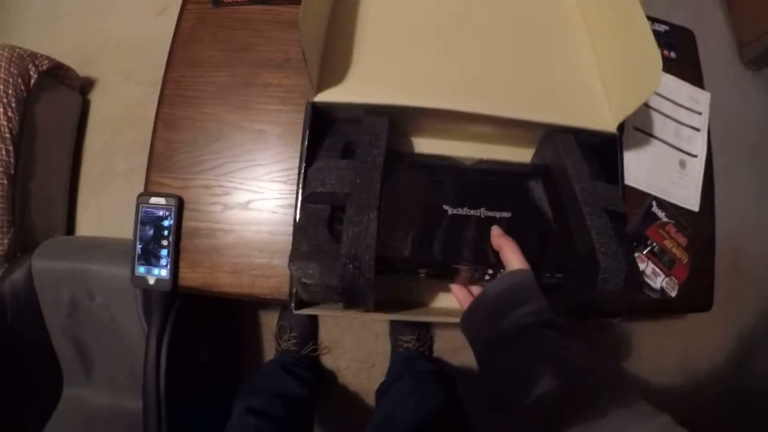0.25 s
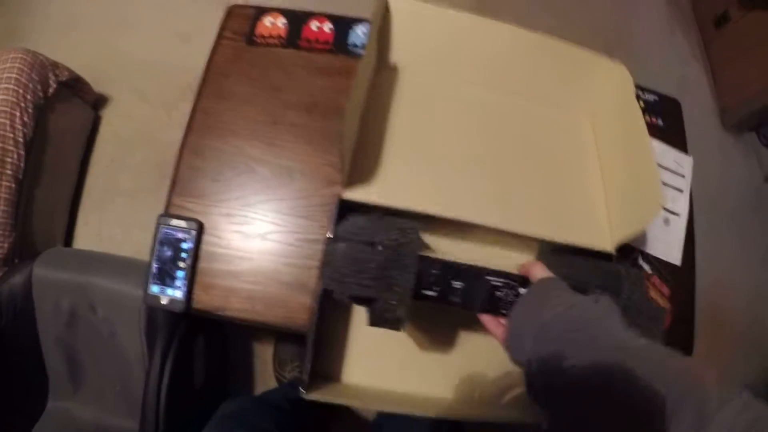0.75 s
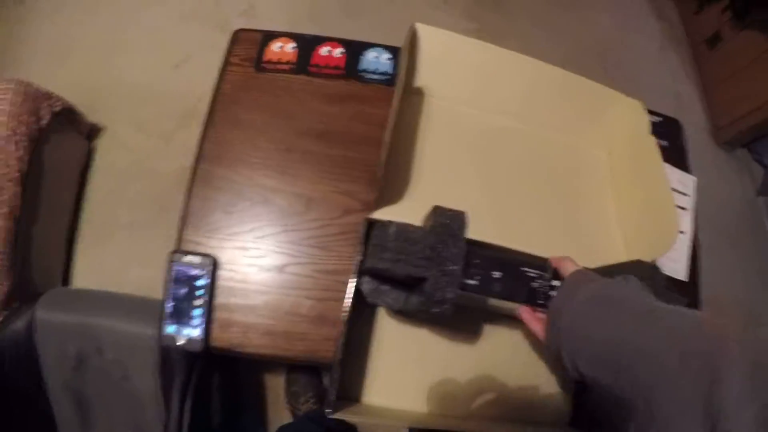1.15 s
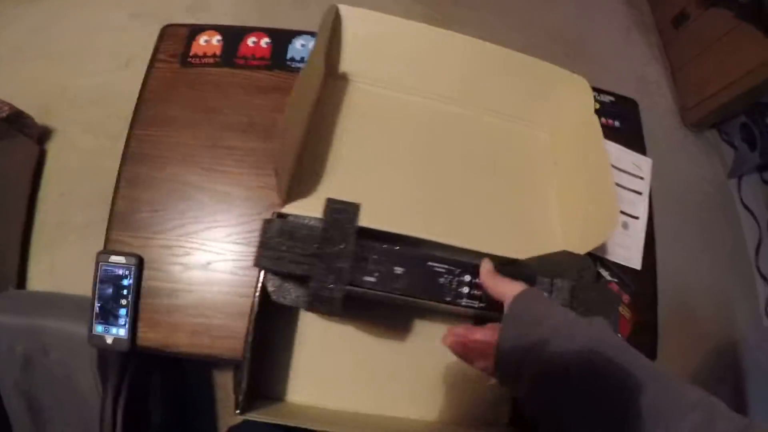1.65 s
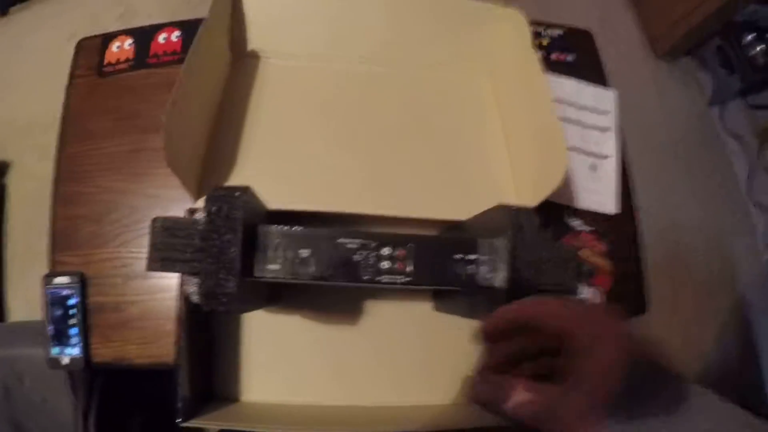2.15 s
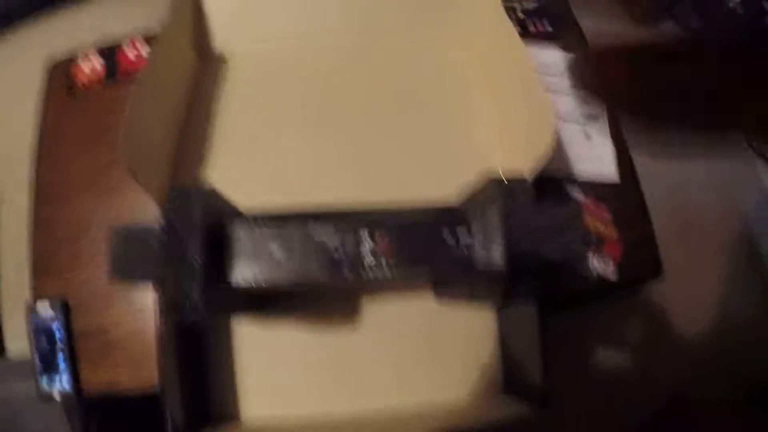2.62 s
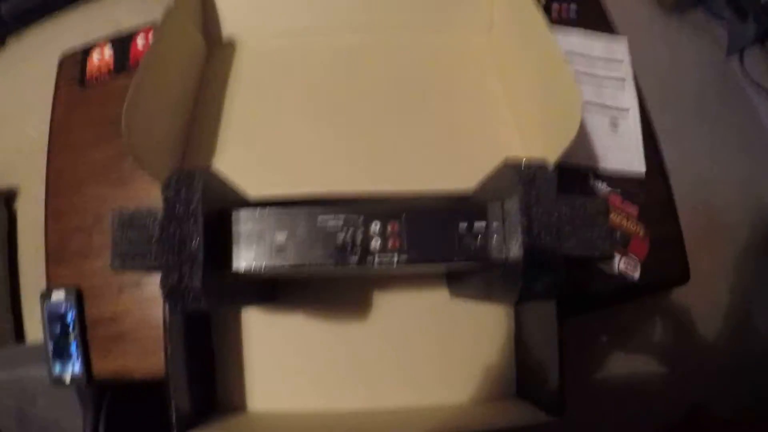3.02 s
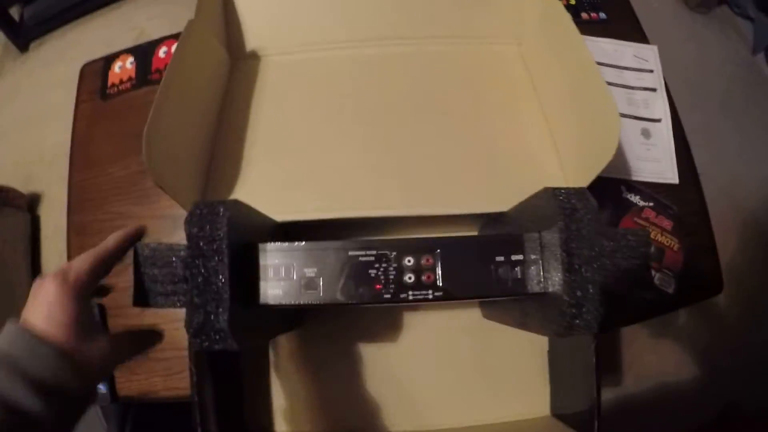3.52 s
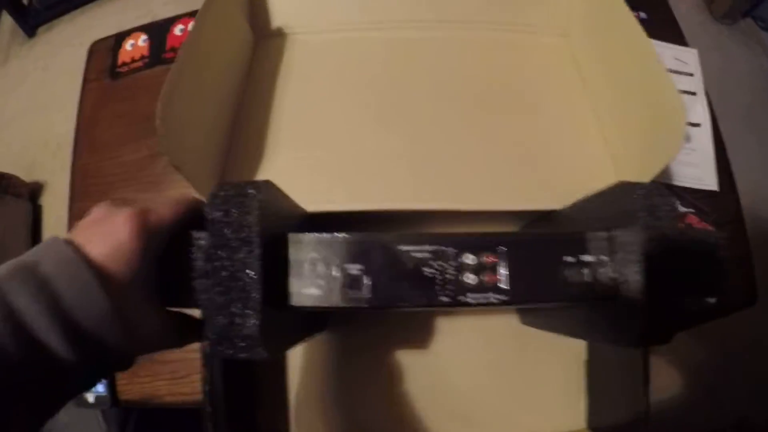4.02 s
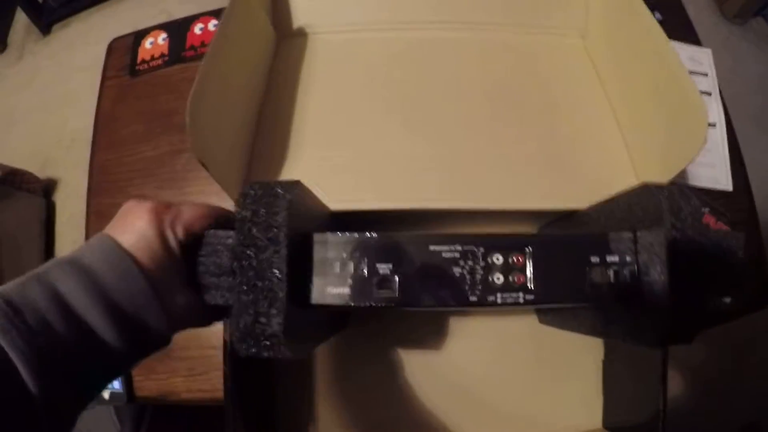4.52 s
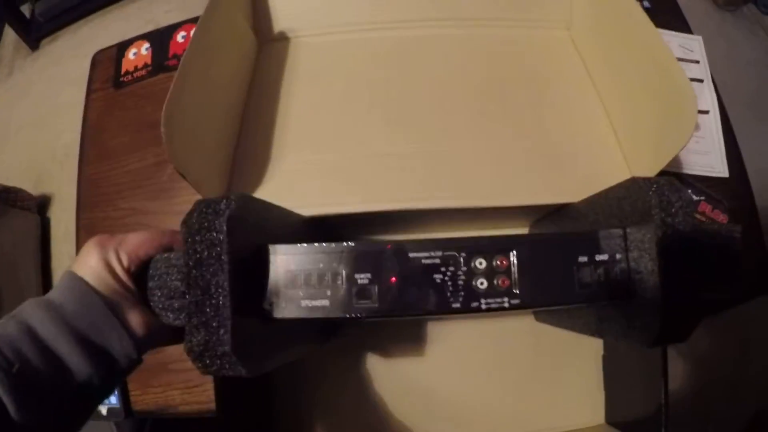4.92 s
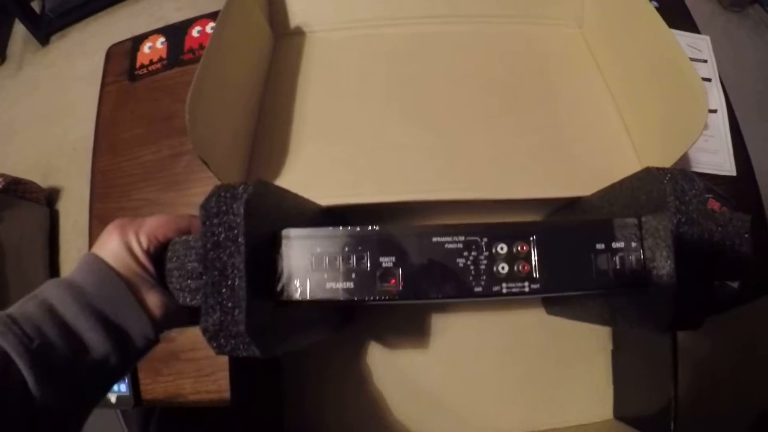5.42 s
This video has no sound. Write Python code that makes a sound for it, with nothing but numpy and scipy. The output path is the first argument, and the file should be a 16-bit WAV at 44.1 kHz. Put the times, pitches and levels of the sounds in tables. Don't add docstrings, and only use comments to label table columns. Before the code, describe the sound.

Foam scrapes and squeaks grainily against cardboard, a thud lands, then loud muffled bumps hit the microphone and foam creaks and crackles.

```python
import sys
import numpy as np
from scipy import signal
from scipy.io import wavfile
from scipy.ndimage import uniform_filter1d

SR = 44100
rng = np.random.default_rng(int(sys.argv[2]) if len(sys.argv) > 2 else 0)


def gain_from_db(level_db):
    decades = np.asarray(level_db, float) / 20
    return 10 ** decades


def unload_audio(sound):
    columns = np.transpose(np.atleast_2d(sound))
    steps = np.round(np.clip(columns, -1, 1) * 32767)
    wavfile.write(sys.argv[1], SR, steps.astype(np.int16))


N = 249768


def evened(x):
    return x / np.sqrt(np.mean(x ** 2) + 1e-20)


def colour(x, points):
    f_hz, db = np.transpose(points)
    bins_hz = np.fft.rfftfreq(8192, 1 / SR)
    log_gain = np.log(gain_from_db(np.interp(np.log(bins_hz + 1), np.log(f_hz), db, -100, -100)))
    circle = np.r_[log_gain, log_gain[-2:0:-1]]
    phase = signal.hilbert(circle).imag
    taps = np.fft.ifft(np.exp(circle - 1j * phase)).real[:6000]
    return signal.oaconvolve(x, taps / np.linalg.norm(taps))[:len(x)]


def add(mix, s, sound):
    part = mix[round(s * SR):][:len(sound)]
    part += sound[:len(part)]


def room():
    # (frequency [Hz], level [dB per Hz])
    rumble_spectrum = [(12, -31), (20, 2.5), (43, -6.5), (65, -11.5), (160, -24), (221, -29), (294, -28),
                       (332, -30.5), (398, -31), (487, -38), (517, -36.5), (572, -39), (2500, -58.5),
                       (3250, -72.5), (5500, -120)]
    # (time [s], level re mean [dB])
    swell_points = [(0, 3), (.5, -3.5), (1, 1), (1.5, -1), (2, -1.5), (2.5, 0), (3, 4), (3.5, -5), (4, 1.5),
                    (4.5, -3.5), (5, -2), (5.66, -2)]
    # (frequency [Hz], level [dB per Hz])
    hiss_spectrum = [(1500, -31), (2500, -5), (3400, -12), (4260, -22), (5900, -16.5), (6500, -1),
                     (7900, -1.5), (10300, -6.5), (12000, -14), (13500, -21), (15200, -30)]
    rumble_db, hiss_db, crossover_hz = -34, -64.9, 140
    rumble = gain_from_db(rumble_db) * colour(rng.standard_normal(N), rumble_spectrum)
    low = signal.sosfiltfilt(signal.butter(2, crossover_hz, fs=SR, output="sos"), rumble)
    swell = gain_from_db(np.interp(np.arange(N) / SR, *np.transpose(swell_points)))
    hiss = gain_from_db(hiss_db) * colour(rng.standard_normal(N), hiss_spectrum)
    return rumble + low * (swell - 1) + hiss


def slips(per_s, spread_db, clump_db, clump_ms):
    clump = evened(uniform_filter1d(rng.standard_normal(N), int(clump_ms * SR / 1000)))
    size = gain_from_db(spread_db * np.minimum(rng.exponential(1, N), 4) + clump_db * clump)
    released = rng.random(N) < per_s / SR
    return evened(size * rng.standard_normal(N) * released)


def surges(rows, parts):
    t = np.arange(0, N + 16, 16) / SR
    start, peak, end, db, lean = np.transpose(rows)[:, :, None]
    rise = (t - start) / (peak - start)
    fall = (end - t) / (end - peak)
    ramp = np.clip(np.minimum(rise, fall), 0, 1)
    gains = []
    for re_db, db_per_lean, sharp in parts:
        each = gain_from_db(db + re_db + db_per_lean * lean) * ramp ** sharp
        gains.append(np.interp(np.arange(N) / SR, t, np.sqrt((each ** 2).sum(0))))
    return gains


def rub(gains, fizz, ring, drive):
    # (frequency [Hz], level [dB per Hz])
    wall = [(450, 0.5), (750, 3), (950, 2), (1280, 5), (1550, 1), (2000, -8), (3000, -21)]
    # (frequency [Hz], level [dB per Hz])
    air = [(70, -21), (130, -9), (220, 7), (300, -4), (380, 6), (520, -5), (900, -4)]
    # (frequency [Hz], level [dB per Hz])
    sheen_spectrum = [(5000, -34), (6800, 0), (8300, -2), (9900, -2.5), (11000, -12.5), (13000, -18),
                      (15200, -33)]
    body = sum((-1) ** k * colour(drive * gains[k], c) for k, c in enumerate((fizz, ring, wall, air)))
    sheen = gain_from_db(-47.0) * abs(gains[0] / gain_from_db(-35.5)) ** 1.19
    return body + colour(drive * rng.choice([-1, 1], N) * sheen, sheen_spectrum)


def narrow_ring(drive, rows, points, sharp):
    gain = surges(rows, [(0, 0, sharp)])[0]
    return colour(rng.choice([-1, 1], N) * drive * gain, points)


def sliding():
    # (start [s], peak [s], end [s], fizz [dB], darkness [dB])
    slide_surges = [
        (-.09, .12, 0.51, -39.5, -5),
        (.24, .458, 0.71, -38.5, -1.5),
        (.48, .622, 0.82, -40.5, -4.5),
        (.67, .725, .8, -43, -6.5),
        (.75, .83, 0.88, -46, -0.5),
        (.82, .905, .96, -48.5, 6.5),
        (.9, 1.018, 1.09, -52.5, 7),
        (1.03, 1.075, 1.32, -62.5, 10),
        (1.16, 1.22, 1.27, -63.5, 10.5),
        (1.27, 1.295, 1.3, -63, 13.5),
    ]
    # (level re fizz [dB], tilt [dB per dB of darkness], peak sharpness [1])
    slide_parts = [
        (0.5, 0, 1.64),
        (-0.5, -0.19, 1.31),
        (-2, 0.3, 0.63),
        (-0.5, 1.17, 0.6),
    ]
    # (frequency [Hz], level [dB per Hz])
    fizz_spectrum = [(2500, -101), (3900, -6), (4800, -1), (5600, -1.5), (6200, -7.5), (6800, -21),
                     (8000, -21), (11000, -42)]
    # (frequency [Hz], level [dB per Hz])
    ring_spectrum = [(1100, -67), (1600, -17), (2000, 7), (2400, 7), (2900, 8.5), (3400, 4), (3900, 6),
                     (5500, -86)]
    # (frequency [Hz], level [dB per Hz])
    panel = [(880, -35), (1020, -8), (1120, 0.5), (1290, 2.5), (1420, 0), (1600, -16), (2100, -40)]
    # (start [s], peak [s], end [s], level [dB], unused lean [dB])
    presses = [
        (.03, .14, 0.37, -47, 0),
        (.24, .47, 0.61, -40, 0),
        (.48, .68, 0.772, -45, 0),
        (1.003, 1.013, 1.034, -48, 0),
    ]
    # (frequency [Hz], level [dB per Hz])
    glint = [(9500, -30), (11000, -4), (12000, 0), (13000, -4), (14500, -14), (15200, -25)]
    # (start [s], peak [s], end [s], level [dB], unused lean [dB])
    rushes = [
        (.04, .13, .25, -78, 0),
        (.36, .45, 0.52, -69, 0),
        (.52, .62, .74, -73, 0),
    ]
    drive = slips(9000, 0.34, 0.32, 4.1)
    slide = rub(surges(slide_surges, slide_parts), fizz_spectrum, ring_spectrum, drive)
    return slide + narrow_ring(drive, presses, panel, .68) + narrow_ring(drive, rushes, glint, .8)


def bump(db, hz, t60, rise_ms, sag_ms):
    t = np.arange(SR // 4) / SR
    turns = hz * sag_ms / 1000 * np.log(1 + 1000 * t / sag_ms)
    shape = (1 - np.exp(-1000 * t / rise_ms)) * gain_from_db(-60 * (t / t60) ** 2)
    return gain_from_db(db) * shape / shape.max() * np.sin(2 * np.pi * turns)


def jolts():
    # (time [s], peak [dB], swing [Hz], t60 [s], rise [ms])
    pushes = [(0.142, -32, 151, 0.093, 9.1), (0.95, -15.5, 132, 0.045, .92), (.96, -22.5, 95, 0.21, 5.6),
              (0.9846, -9.5, 189, 0.011, 1.9), (1.004, -23.5, 147, 0.032, 1.1),
              (2.606, -3.5, 56, 0.113, 8.6), (2.696, -16, 48, 0.031, 3.1), (2.788, -17, 35, 0.028, 5.94),
              (2.813, -12, 102, 0.015, 0.82), (2.82, -9.5, 46, .053, 4.2),
              (2.8464, -3.5, 72.4, 0.015, 0.59), (3.022, -17.5, 96, 0.014, 1.2),
              (3.1343, -12, 117, 0.019, 2.3)]
    # (time [s], peak [dB], swing [Hz], t60 [s], rise [ms])
    slaps = [
        (3.0962, -6.5, 118, 0.064, 0.5),
        (3.1299, -7, 87.4, 0.062, 0.5),
    ]
    # (time [s], peak [dB], swing [Hz], t60 [s], rise [ms])
    pulls = [(0.9453, -21, 122, 0.0093, 2.2), (.985, -7, 159, 0.014, .67), (1.022, -24, 67.4, 0.041, 2.5),
             (2.793, -7, 41.4, 0.06, 1.1), (2.844, -3, 233, 0.0072, 0.85), (2.853, -1, 66, 0.049, 7.3),
             (2.9475, -5, 91, 0.043, 0.84), (3.0951, -9.5, 168, 0.0062, .55), (3.129, 0, 187, 0.0091, 0.31),
             (4.486, -24, 63.44, 0.047, 2.5), (4.656, -21, 56, 0.11, 1.69)]
    out = np.zeros(N)
    for way, rows, sag_ms in ((0.67, pushes, 210), (0.7, slaps, 11), (-0.51, pulls, 31)):
        for s, *row in rows:
            add(out, s, way * bump(*row, sag_ms))
    return out


def knocks():
    # (time [s], peak [dB], ring [Hz], t60 [s])
    body_knocks = [(0.9495, -28.5, 420.6, 0.16), (0.987, -29, 430, 0.1), (0.985, -32.5, 880, 0.023),
                   (1.0033, -23.5, 395, 0.036), (1.0095, -40, 1680, 0.04), (1.007, -44, 1240, 0.026),
                   (1.01, -33, 420, .05), (1.012, -38, 780, 0.049), (1.066, -38, 420, 0.137),
                   (1.066, -47.5, 2200, .04), (1.067, -48, 4660, 0.034), (2.6053, -26, 1150, 0.019),
                   (2.605, -26.5, 274, 0.038), (2.8125, -16.5, 374, 0.02), (2.848, -24, 1250, 0.014),
                   (2.946, -32, 660, .015), (3.043, -40, 1500, 0.0071), (3.129, -11, 510, 0.017),
                   (.955, -30.5, 660, 0.047), (1, -37, 690, 0.054), (1.03, -50, 696, 0.067)]
    # (time [s], peak [dB], ring [Hz], t60 [s])
    cells = [(4.492, -38, 2970, 0.0067), (4.5178, -46, 2300, .006), (4.532, -46, 2000, 0.0073),
             (4.532, -42, 3800, .005), (4.532, -44, 1150, .012), (4.551, -50, 5200, .01),
             (4.6095, -46, 2150, .01), (4.6578, -41, 5000, .007), (4.6574, -43, 2300, .007),
             (4.7145, -46, 2700, .008), (4.7483, -45, 2130, 0.0092), (4.789, -42, 5640, .008),
             (4.8244, -36, 3000, .008), (4.827, -36, 5500, 0.011), (4.86, -36, 3000, 0.0096),
             (4.9645, -42, 5500, .01), (5.0575, -31, 6230, .01), (5.057, -43, 2020, .012),
             (5.061, -48, 3900, 0.0071), (5.095, -32, 6600, .008), (5.096, -37, 2820, 0.009),
             (5.1645, -46, 2703, 0.0097), (5.46, -41, 5206, .008), (1.5393, -37, 5152, 0.007),
             (1.5382, -46, 1900, .008), (3.79, -36, 5000, 0.011), (3.79, -40, 2800, .012),
             (.9456, -44, 10300, 0.0091), (.9456, -62, 13900, .005), (2.8115, -46, 7000, .006),
             (2.848, -45, 8600, .008), (3.094, -56, 13000, .004)]
    # (time [s], peak [dB], ring [Hz], t60 [s])
    cracks = [
        (3.0935, -4, 1200, .005),
        (3.0937, -22, 2600, .005),
        (3.1282, 6, 1080, .004),
        (3.1284, -21, 2600, .006),
    ]
    out, t = np.zeros(N), np.arange(SR // 5) / SR
    for rows, rise_turns in (([*body_knocks, *cells], .12), (cracks, .5)):
        for s, db, hz, t60 in rows:
            rise = 1 - np.exp(-t * hz / rise_turns)
            add(out, s, -gain_from_db(db - 60 * t / t60) * rise * np.sin(2 * np.pi * hz * t))
    return out


def snaps():
    # (time [s], peak [dB], lower ring re peak [dB], extra
    # top [dB])
    snap_events = [(4.493, -29, -1.5, -3), (4.517, -46, -9, 2), (4.5318, -35, 0, -6), (4.5506, -48, -9, -4),
                   (4.587, -46, -1, -6), (4.609, -51, 4, -4), (4.658, -41, 0, -8), (4.6684, -35.5, 0, -14),
                   (4.7136, -40.5, -3, -2), (4.746, -39.5, 5.5, 2), (4.789, -37, -9, 2),
                   (4.8248, -33.5, -3.5, -3), (4.8566, -32, -1, 4), (4.861, -39, 2, -1),
                   (4.867, -38, -2.2, -1.5), (4.878, -40, -3, 0), (4.9046, -31.5, 1, 4.5),
                   (4.9427, -40, -7, 6), (4.9634, -44, -15, 0.1), (4.969, -35.5, -4, -9),
                   (4.9981, -41, -12, 2), (5.019, -48, -11, 0.1), (5.0316, -46, 1, -3),
                   (5.0554, -30.5, -2, 5), (5.059, -31, -6, -1), (5.0792, -32.5, 3.5, 3),
                   (5.0952, -30.5, -9, 1), (3.7817, -33, -16, -10), (3.901, -44, -7, 6),
                   (3.0936, -44, 4, 13), (3.1357, -48, 0, 0)]
    # (time [s], peak [dB], lower ring re peak [dB])
    ticks = [(1.0057, -47, 3), (1.07, -48, 2), (1.09, -48, -9), (2.982, -63, 3), (3.014, -64, 3),
             (1.286, -56, -9), (1.3266, -50, -7), (1.341, -58, -9), (1.3672, -55, -6), (1.516, -50, -6),
             (1.5378, -45, -8), (3.001, -59, 4), (3.042, -58, 2), (3.6252, -51, -11), (3.803, -43, -18),
             (4.312, -60, 5), (5.1633, -40, 5), (5.1785, -52, -14), (5.205, -52, -14), (5.2894, -58, -11),
             (5.345, -54, -2), (5.371, -54, -9), (5.384, -49, -14), (5.414, -48, -7), (5.4322, -46, -1),
             (5.4596, -45.5, -16)]
    # (time [s], peak [dB], lower ring re peak [dB])
    clinks = [
        (.9454, -52, 6),
        (.982, -52, 3),
    ]
    # (time [s], peak [dB], lower ring re peak [dB])
    crackle = [(3.654, -48, -6), (3.79, -39, -12), (3.869, -47, -13), (3.94, -42, -8), (3.988, -43, -6),
               (4.018, -53, -6), (4.036, -49, -9), (4.289, -54, 10), (4.524, -54, -3), (4.566, -52, -1),
               (4.625, -50, -3), (4.64, -51, -1.5), (4.68, -48, -7), (4.687, -48, -3), (4.698, -55, 4),
               (4.72, -46, -7), (4.75, -46, -6), (4.779, -49, -7), (4.804, -46, -2), (4.813, -53, -9),
               (4.83, -43, -12), (4.843, -45, -1.5), (4.888, -47, -4), (4.909, -41, 1.5), (4.922, -44, 1.5),
               (4.949, -44, 0), (4.958, -45, 3), (5.028, -47, -5), (5.05, -41, -1), (5.062, -41, -14),
               (5.074, -38, -3), (5.107, -46, -4), (5.121, -46, -6), (5.155, -56, 0)]
    # (deep part re peak [dB], top re peak [dB], t60 [s])
    kinds = [
        (-10.5, -14.5, 0.014),
        (-12, -13, 0.026),
        (0, 0, 0.021),
        (-9, -18, 0.027),
    ]
    # (frequency [Hz], level [dB per Hz])
    part_colours = [
        [(2500, -49), (3900, -9), (5300, 3), (6100, -1.5), (7000, -18), (10000, -25)],
        [(1200, 4), (2000, 0.5), (3100, 14), (3700, 6.5), (4400, -7), (6500, -53)],
        [(450, -11), (850, 4.5), (1100, 5.5), (1700, -10), (3000, -33)],
        [(5000, -34), (7000, 7), (8600, 9), (10000, 3), (12000, -16), (15200, -18)],
    ]
    deep_db_per_ring_db, top_db_per_peak_db = 0.41, -0.086
    drive, t = np.zeros((4, N)), np.arange(900) / SR
    for rows, (deep_db, top_db, t60) in zip((snap_events, ticks, clinks, crackle), kinds):
        for s, db, ring_db, *extra_db in rows:
            noise = rng.standard_normal(len(t))
            burst = .15 * noise * gain_from_db(-60 * t / t60) + (t == 0)
            deep = deep_db + deep_db_per_ring_db * ring_db
            top = top_db + top_db_per_peak_db * (db + 35) + sum(extra_db)
            for part, rel_db in zip(drive, (9, ring_db + 9.5, deep + 12.8, top + 14)):
                add(part, s + 0.00037, gain_from_db(db + rel_db) * burst)
    return sum((-1) ** k * colour(drive[k], c) for k, c in enumerate(part_colours))


def stroking():
    # (start [s], peak [s], end [s], case [dB], brightness [dB])
    strokes = [(2.604, 2.607, 2.66, -37, 6), (2.604, 2.632, 2.676, -36, 6.5),
               (2.684, 2.695, 2.73, -36.5, 0.5), (2.688, 2.718, 2.785, -32, 6),
               (2.69, 2.755, 2.815, -23.5, -13), (2.78, 2.816, 2.821, -39.5, 1),
               (2.845, 2.85, 2.875, -38.5, 1.5), (2.846, 2.906, 2.95, -37, -1),
               (2.943, 2.948, 2.975, -40.5, 1), (2.815, 2.83, 2.85, -55.5, 0), (3.025, 3.07, 3.12, -43, -5),
               (3.071, 3.09, 3.0975, -26, -4.5), (3.098, 3.099, 3.11, -39, 8),
               (3.104, 3.126, 3.131, -25, -10), (3.132, 3.133, 3.14, -28.5, -11),
               (3.35, 3.371, 3.4, -53.5, -9)]
    # (level re case [dB], tilt [dB per dB of brightness], peak sharpness [1])
    stroke_parts = [
        (0, 0.091, 1.55),
        (-14, 0.84, 1.28),
        (-2.5, 0.51, 1),
    ]
    # (frequency [Hz], level [dB per Hz])
    case = [(150, -11), (400, -5.5), (800, -6), (1050, -4), (1270, -1), (1480, -6), (2100, -13.5),
            (2800, -28.5), (4000, -62)]
    # (frequency [Hz], level [dB per Hz])
    skin = [(1500, -11), (2650, -2), (3100, 3.5), (3900, -3), (5000, 0.5), (5600, -4), (6250, 0.5),
            (7000, -8.5), (9500, -12.5), (11000, -21), (15500, -53)]
    # (frequency [Hz], level [dB per Hz])
    push = [(15, -43), (35, -24), (100, -6.5), (200, -11), (400, -23), (800, -53)]
    gains = surges(strokes, stroke_parts)
    return sum(colour(slips(14000, 1.7, 0.63, 1.8) * g, c) for g, c in zip(gains, (case, skin, push)))


def gripping():
    # (start [s], peak [s], end [s], fizz [dB], darkness [dB])
    creeps = [(3.62, 3.652, 3.68, -60, 4), (3.67, 3.7, 3.75, -74, 0), (3.738, 3.79, 3.85, -49, -4.5),
              (3.78, 3.93, 4.01, -53, 8), (3.97, 4.1, 4.21, -53, 1.5), (4.18, 4.288, 4.3, -63, 12),
              (4.295, 4.315, 4.335, -68, 8), (4.29, 4.4, 4.55, -64.5, -3), (4.42, 4.664, 4.82, -59, -1),
              (4.812, 4.845, 4.95, -49, -2), (4.83, 4.935, 4.985, -54, 1.5), (4.96, 4.985, 5.02, -60, -3),
              (5.0, 5.04, 5.12, -55, 2), (5.03, 5.115, 5.15, -56, 1), (5.13, 5.42, 5.52, -78, -10)]
    # (level re fizz [dB], tilt [dB per dB of darkness], peak sharpness [1])
    grip_parts = [
        (-1.5, 0.0021, 0.44),
        (-2, 0.73, 0.45),
        (-7, 0.45, 1),
        (-6, 0.69, 0.56),
    ]
    # (frequency [Hz], level [dB per Hz])
    grip_fizz = [(3000, -40), (3900, -11.5), (4500, -2), (5000, -1.5), (5600, -1), (6300, -12), (7500, -22),
                 (11000, -32)]
    # (frequency [Hz], level [dB per Hz])
    grip_ring = [(1100, -41), (1600, -8), (2300, -8), (2600, -2.5), (2950, -2), (3300, -4.5), (3800, -12),
                 (5500, -23)]
    # (frequency [Hz], level [dB per Hz])
    hollow = [(450, -30), (620, -10), (700, 0), (780, 0), (880, -16), (1200, -35)]
    # (start [s], peak [s], end [s], level [dB], unused lean [dB])
    kneads = [
        (3.76, 3.8, 3.82, -60, 0),
        (3.815, 3.845, 3.97, -63, 0),
        (3.89, 3.945, 4.01, -55, 0),
    ]
    grip = rub(surges(creeps, grip_parts), grip_fizz, grip_ring, slips(6000, 1.3, 0.81, 5.6))
    return grip + narrow_ring(slips(9000, 0.34, 0.32, 4.1), kneads, hollow, .7)


def ducking(loud):
    threshold_db, share, recover_db_per_s = -20, 0.61, 250
    power_db = 10 * np.log10(abs(uniform_filter1d(loud ** 2, size=200)) + 1e-12)
    fall_db = np.arange(N) * recover_db_per_s / SR
    held_db = np.maximum.accumulate(power_db + fall_db) - fall_db
    over_db = np.maximum(held_db - threshold_db, 0)
    return gain_from_db(-share * uniform_filter1d(over_db, size=100))


def scene():
    blows = jolts() + knocks()
    return (room() * ducking(blows) + sliding() + blows + snaps() + stroking() + gripping())[None]


def starved(x):
    # (frequency [Hz], share of frames lost [1])
    lost_share = [(12500, 0), (13500, .1), (14300, .22), (14800, .5), (15200, .75)]
    hz, t, z = signal.stft(x, SR, nperseg=1024)
    chance = rng.random((len(t) // 2 + 1, len(hz) // 8 + 1))
    chance = np.repeat(np.repeat(chance, 2, axis=0), 8, axis=1)
    kept = chance[:len(t), :len(hz)].T > np.interp(hz, *np.transpose(lost_share))[:, None]
    return signal.istft(z * kept, SR, nperseg=1024)[1][:, :N]


def low_pass(x):
    return signal.sosfilt(signal.butter(12, 15180, fs=SR, output="sos"), x)


def record(dry):
    limited = 0.99 * np.tanh(dry / 0.7)
    edge = signal.firwin(511, 15230, window=("kaiser", 9), fs=SR)
    mix = starved(signal.oaconvolve(limited, edge[None], "same"))
    return low_pass(mix)


dry = scene()
out = record(dry)
unload_audio(out)
```